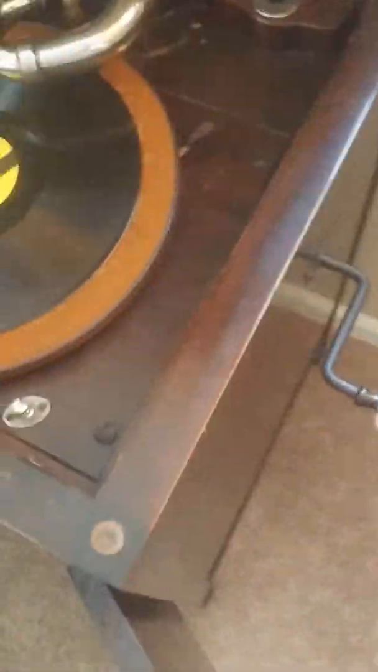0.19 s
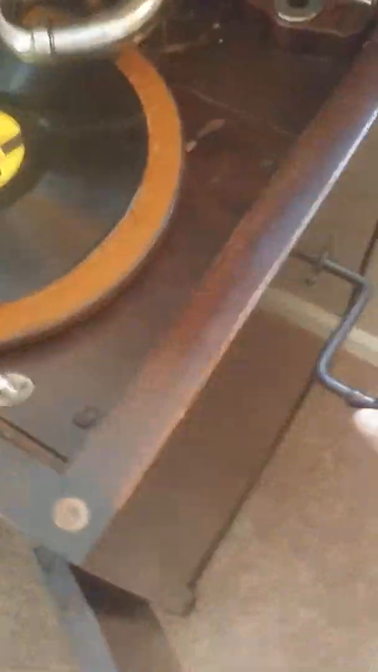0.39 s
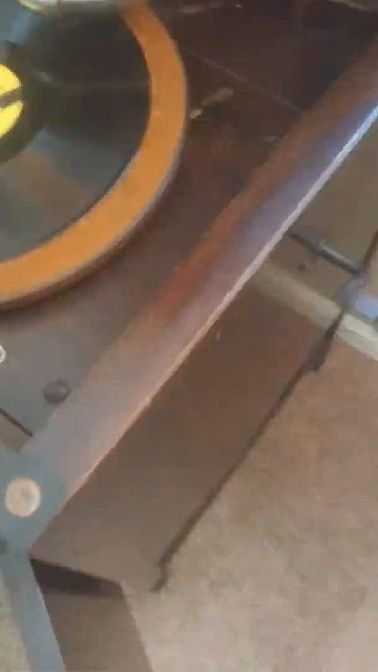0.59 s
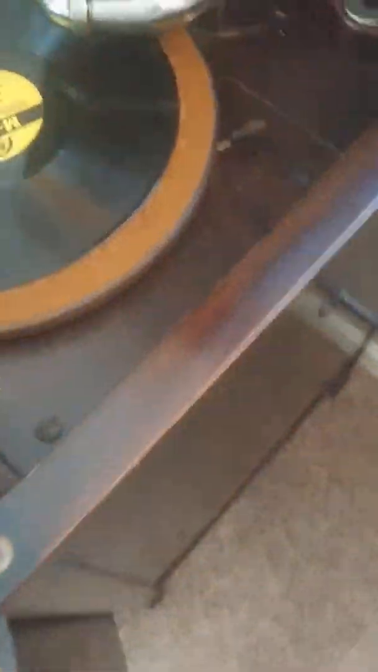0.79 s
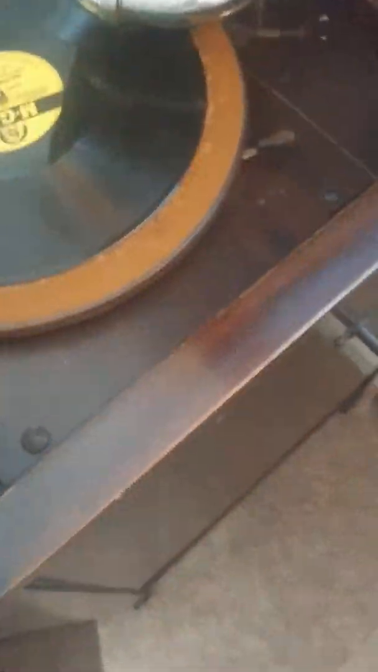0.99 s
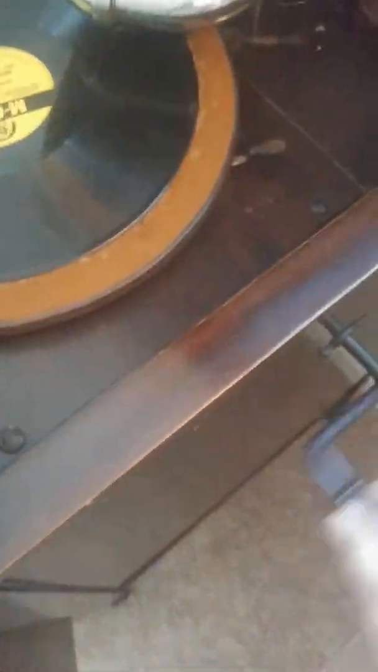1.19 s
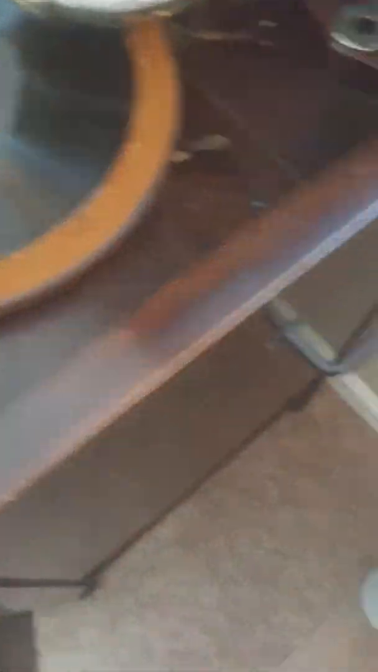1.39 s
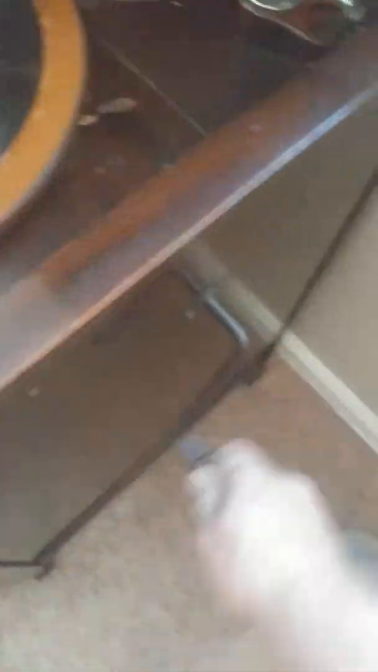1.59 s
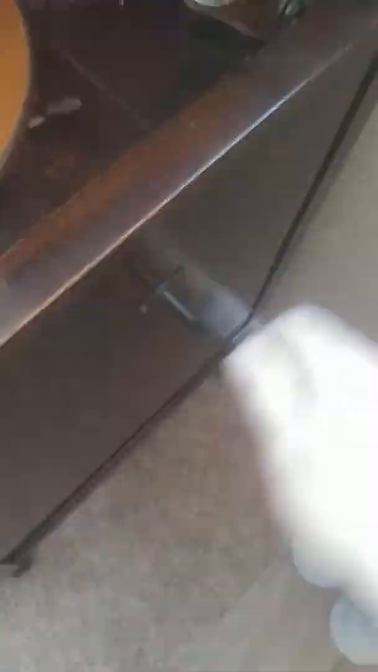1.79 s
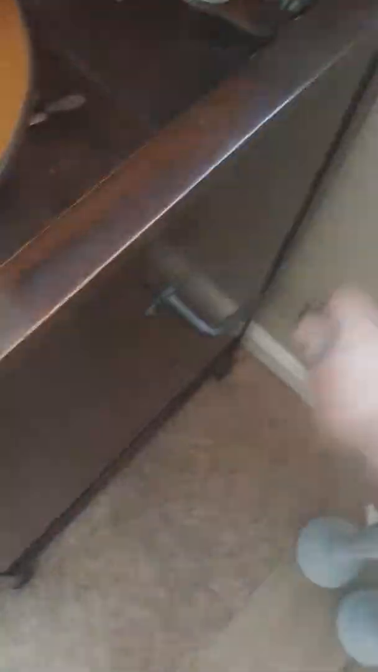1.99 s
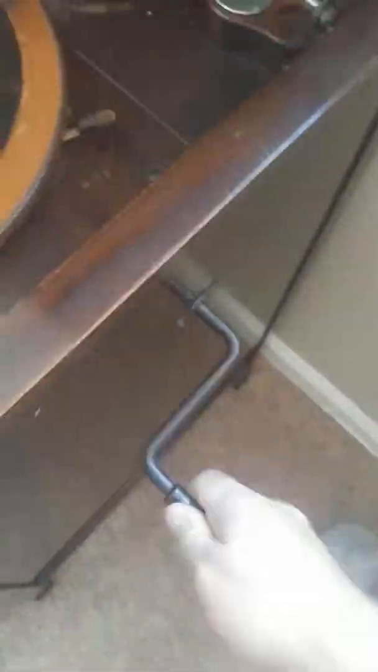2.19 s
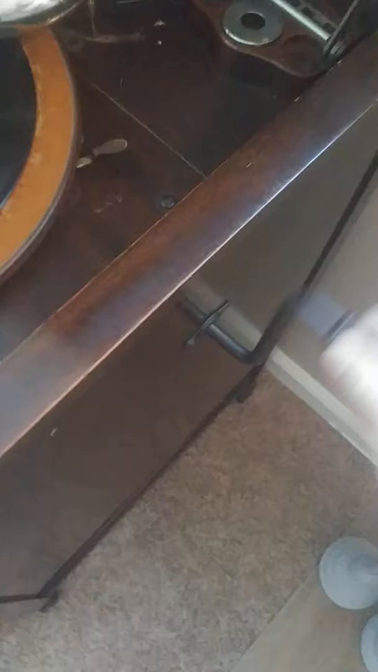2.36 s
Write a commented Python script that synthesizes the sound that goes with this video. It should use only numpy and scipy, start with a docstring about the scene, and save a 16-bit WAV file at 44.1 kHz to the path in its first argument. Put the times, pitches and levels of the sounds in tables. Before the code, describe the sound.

Hand crank winding gears inside a wooden cabinet: two sharp knocks early, the second louder with a bright metal tick, then steady ratcheting, scraping and regular loose clacks, heard close in a small room.

```python
"""In a small room, a stereo pair hears the spring motor of a wooden cabinet phonograph wound by hand.
Gear chatter and a faint crank clack open; two sharp knocks follow as the crank is taken up, with sizzling metal.
Then the gear teeth chatter on, rub and scrape, while the loose crank clacks and thuds and the cabinet booms.
Impacts are decaying bands of noise, most with ringing modes; the gears are trains of such impacts, the boom
is a wavering sine, and steady noise is the quiet room."""
import sys
import numpy as np
from scipy import signal
from scipy.fft import rfft, irfft
from scipy.io import wavfile
from scipy.ndimage import uniform_filter1d

SR = 44100
rng = np.random.default_rng(int(sys.argv[2]) if len(sys.argv) > 2 else 0)


def store_wav(level_fs):
    """Save 16-bit WAV to argv[1]."""
    pcm = np.round(np.clip(np.atleast_2d(level_fs), -1, 1) * 32767)
    wavfile.write(sys.argv[1], SR, pcm.T.astype(np.int16))


N = 110250  # 2.5 s


def amp(db):
    """Decibels to gain."""
    return 10 ** (np.asarray(db) / 20)


def read(points, hz):
    """Reads a spectrum table on a log-frequency axis."""
    f, value = np.transpose(points)
    return np.interp(np.log(hz + 1), np.log(f + 1), value)


def curve(points):
    """Reads a time table at every sample, straight between its points."""
    return np.interp(np.arange(N) / SR, *np.transpose(points))


def evened(x):
    """Scales to rms 1."""
    return x / np.sqrt(np.mean(x ** 2) + 1e-20)


def pan(db):
    """Left and right gains for a level difference, positive to the left."""
    return amp([[db / 2], [-db / 2]])


def add(mix, s, sound):
    """Mixes a stereo sound in at time s."""
    part = mix[:, max(round(s * SR), 0):][:, :sound.shape[1]]
    part += sound[:, :part.shape[1]]


def decay(t, t60):
    """Falls by 60 dB in t60 seconds."""
    return np.exp(-np.log(1000) * t / t60)


# Likeness of the two microphones: columns pitch_hz, correlation
MIC_LIKENESS = [(140, 0.98), (290, 0.95), (450, 0.6), (700, -0.24), (1050, -0.14), (3000, -0.0029)]
# Lean of the sound towards the left microphone: columns pitch_hz, left_over_right_db
LEFT_LEAN = [(150, 1), (330, 0), (600, -1.5), (1400, 3), (3000, 0), (6500, -8), (10500, 10.5), (13000, 1)]
LEFT_LEAD = .3  # share of the left-right difference that is a quarter cycle ahead of the common part


def noise(colour, size):
    """Stereo noise of a given colour, most alike at the two microphones in the bass."""
    hz = np.fft.rfftfreq(size, 1 / SR)
    a, b = np.exp(2j * np.pi * rng.random((2, len(hz))))
    same = read(MIC_LIKENESS, hz)
    mid = a * np.sqrt(1 + same)
    side = (1j * LEFT_LEAD * a + np.sqrt(1 - LEFT_LEAD ** 2) * b) * np.sqrt(1 - same)
    lean_db = read(LEFT_LEAN, hz) * np.array([[.5], [-.5]])
    spectrum = np.array([mid + side, mid - side]) * amp(read(colour, hz) + lean_db)
    return evened(irfft(spectrum, size))


TREBLE_HZ = 1530  # crossover from wood to metal


def treble_share(hz):
    """Near 0 in the wood's range, near 1 in the metal's."""
    return 1 / (1 + (TREBLE_HZ / hz) ** 4)


# Ringing of the struck body: columns pitch_hz, t60_s
BODY_RING = [(60, 0.19), (150, 0.19), (500, 0.16), (1200, 0.039), (3000, 0.1), (10000, 0.032)]
# Tail of the small room: columns pitch_hz, t60_s
ROOM_TAIL = [(60, 0.46), (16000, 0.21)]
# Start of that tail against the direct ringing: columns pitch_hz, level_db
ROOM_TAIL_LEVEL = [(60, -28), (500, -13.5), (2000, -16), (10000, -16)]
RISE_S, RISE_CYCLES = 0.00078, 1  # each band's rise time is the sum of both


def blow(colour, treble_db=0, lag_s=0, size=22050, compact=True):
    """Dense ringing of a struck body: each band swells, dies quickly and leaves a room tail."""
    hz = np.fft.rfftfreq(size, 1 / SR)
    spectrum = rfft(noise(colour, size))
    out = np.zeros((2, size))
    centres = np.geomspace(60, 14000, 12)
    for f, share in zip(centres, np.eye(len(centres))):
        high = treble_share(f)
        t = np.maximum(np.arange(size) / SR - lag_s * (1 - high), 0)  # the wood answers late
        band_gain = np.interp(np.log(hz + 1), np.log(centres), share)
        band = irfft(spectrum * band_gain, size)
        # A compact blow has no late swells.
        power = uniform_filter1d((band ** 2).mean(0), int(6 * SR / f), mode="wrap")
        steady = band / np.sqrt(power) if compact else band
        rise = 1 - np.exp(-(t / (RISE_S + RISE_CYCLES / f)) ** 2)
        direct = decay(t, read(BODY_RING, f))
        tail = amp(read(ROOM_TAIL_LEVEL, f)) * decay(t, read(ROOM_TAIL, f))
        envelope = rise * np.hypot(direct, tail)
        level = band.std() * np.sqrt(np.mean(envelope ** 2)) * amp(treble_db * high)
        out += evened(steady * envelope) * level
    return out


def blows(table, colour, lag_s=0):
    """Plays a table of blows of one kind."""
    out = np.zeros((2, N))
    for s, db, treble_db in table:
        add(out, s, amp(db) * blow(colour, treble_db, lag_s))
    return out


MODES_DB, MODE_RISE_CYCLES = -6.5, 3.3  # all modes against their blow; time constant of the rise


def ringing(table, modes):
    """Each blow sets single modes ringing; the higher ones mostly reach the microphones more out of step."""
    out, t = np.zeros((2, N)), np.arange(SR // 2) / SR
    for s, db, treble_db in table:
        for hz, mode_db, t60 in modes:
            lag = np.arccos(read(MIC_LIKENESS, hz)) * np.array([[0], [1]])  # the right one lags
            tone = np.sin(2 * np.pi * (hz * t + rng.random()) - lag)
            rise = 1 - np.exp(-t * hz / MODE_RISE_CYCLES)
            level = amp(db + mode_db + MODES_DB + treble_db * treble_share(hz))
            add(out, s, level * tone * rise * decay(t, t60) * pan(read(LEFT_LEAN, hz)))
    return out


# Colour of the quiet room: columns pitch_hz, level_db
ROOM_TONE_COLOUR = [(20, -26), (58, 3.5), (130, -12), (200, -24), (3000, -37.5), (7200, -33.5), (8800, -44),
                    (12000, -35.5), (13300, -40)]


def room_tone():
    """The quiet room behind everything, as steady coloured noise."""
    return amp(-51) * noise(ROOM_TONE_COLOUR, N)


# Swells of the cabinet's low boom: columns time_s, level_db
BOOM_SWELLS = [(.25, -60.5), (.3, -37.5), (.4, -73), (1.08, -48.5), (1.29, -39.5), (1.62, -60.5),
               (1.84, -35), (2.06, -58), (2.36, -41), (2.5, -49)]
BOOM_HZ, BOOM_WANDER = 70.96, 0.029  # centre pitch; random spread as a fraction of it


def boom(count=30):
    """The cabinet's lowest resonance: a sine that swells under the load, wavering in pitch."""
    wander = np.interp(np.arange(N), np.linspace(0, N, count), rng.standard_normal(count))
    cycles = np.cumsum(BOOM_HZ * (1 + BOOM_WANDER * wander)) / SR
    return amp(curve(BOOM_SWELLS)) * evened(np.sin(2 * np.pi * cycles))


# Force on the gears: columns time_s, level_db
GEAR_EFFORT = [(0, -27), (.09, -56), (.15, -44.5), (.5, -56.5), (.68, -47.5), (.73, -39.5), (1.09, -42.5),
               (1.2, -39), (1.48, -35.5), (1.64, -39.5), (1.77, -37), (1.9, -43.5), (1.98, -32.5),
               (2.19, -38.5), (2.33, -32), (2.42, -42), (2.5, -31.5)]
# Colour of metal scraping on metal: columns pitch_hz, level_db
SCRAPE_COLOUR = [(700, 5), (2400, -2), (7000, -21.5)]
GRIT_PER_S, GRIT_SPREAD_DB = 36, 3  # mean rate; dB per unit of random strength
GRIT_DB, GRIT_FOLLOW = -30.5, 0.73  # level at 0 dB effort; dB per dB of effort


def grit():
    """Small irregular scrapes of metal on metal, stronger under load."""
    chance, strength = rng.random(N), np.minimum(rng.exponential(1, N), 3)
    clicks = (chance < GRIT_PER_S / SR) * amp(GRIT_SPREAD_DB * strength)
    scrapes = signal.fftconvolve(clicks[None], blow(SCRAPE_COLOUR), axes=1)[:, :N]
    return evened(scrapes) * amp(GRIT_DB + GRIT_FOLLOW * curve(GEAR_EFFORT))


def flutter(depth_db, count=600):
    """A quick random wobble of level."""
    wobble = np.interp(np.arange(N), np.linspace(0, N, count), rng.standard_normal(count))
    return evened(amp(depth_db * wobble))


# Surges of rubbing as the gears bind: columns middle_s, groan_db, scrape_db
RUB_SURGES = [(0.751, -38, -71), (0.828, -37.5, -78), (1.236, -32.5, -52), (1.45, -31.5, -47),
              (1.515, -36.5, -49), (1.963, -33.5, -63)]
# Colour of the gears through the cabinet: columns pitch_hz, level_db
GEAR_CABINET_COLOUR = [(40, -17.5), (60, 1.5), (150, 5), (200, -14.5), (285, 5.5), (370, -9), (485, 8.5),
                       (700, -5), (830, 5), (1000, -4), (1250, -12), (2600, -40), (7000, -35), (16000, -54)]
RUB_S, RUB_FLUTTER_DB = 0.023, 2.7  # time from the middle to 1/e; random spread of level


def rubs():
    """The gears bind in short rough surges: a groan in the cabinet and a scrape of metal."""
    t, out = np.arange(N) / SR, np.zeros((2, N))
    groan, scrape = noise(GEAR_CABINET_COLOUR, N), noise(SCRAPE_COLOUR, N)
    for s, groan_db, scrape_db in RUB_SURGES:
        surge = np.exp(-((t - s) / RUB_S) ** 2)
        out += surge * (amp(groan_db) * groan + amp(scrape_db) * scrape)
    return out * flutter(RUB_FLUTTER_DB)


TEETH_PER_S, TOOTH_JITTER, TOOTH_SPREAD_DB = 87, .13, 2  # jitter in tooth spacings
RASP_DB = -14  # rubbing between the clicks, relative to them


def gears(count=8, size=400):
    """Gear teeth rub and click unevenly into the cabinet, as hard as the hand pushes."""
    jitter, strength, order = rng.standard_normal((size, 3)).T
    at = ((np.arange(size) + TOOTH_JITTER * jitter) * SR / TEETH_PER_S).astype(int)
    which = np.argsort(order) % count  # each tooth gets one of a few different click sounds
    out = np.zeros((2, N))
    for k in range(count):
        clicks = np.zeros(N)
        use = (at >= 0) & (at < N) & (which == k)
        clicks[at[use]] = amp(TOOTH_SPREAD_DB * strength[use])
        click_sound = blow(GEAR_CABINET_COLOUR, compact=False)
        out += signal.fftconvolve(clicks[None], click_sound, axes=1)[:, :N]
    rasp = amp(RASP_DB) * noise(GEAR_CABINET_COLOUR, N)
    return (evened(out) + rasp) * amp(curve(GEAR_EFFORT))


# Colour of the loose metal: columns pitch_hz, level_db
LOOSE_METAL_COLOUR = [(300, -13), (7200, -10), (8800, -17), (10800, -13), (16000, -28)]
SIZZLE_START_S, SIZZLE_HOLD_S, SIZZLE_RELEASE_S, SIZZLE_DB = 0.23, 0.17, 0.045, -49
SIZZLE_PER_S, SIZZLE_RING_S = 220, 0.012  # mean contacts per second; 1/e decay of each


def sizzle(size=2048):
    """Loose metal rattles around the second knock in a quick uneven patter that holds, then fades."""
    t = np.arange(N) / SR - SIZZLE_START_S
    attack = np.clip(t / .01, 0, 1)
    release = np.exp(-np.maximum(t - SIZZLE_HOLD_S, 0) / SIZZLE_RELEASE_S)
    contact = noise(LOOSE_METAL_COLOUR, size) * np.exp(-np.arange(size) / SR / SIZZLE_RING_S)
    hits = (rng.random((1, N)) < SIZZLE_PER_S / SR).astype(float)
    patter = signal.fftconvolve(hits, contact, axes=1)[:, :N]
    return amp(SIZZLE_DB) * attack * release * evened(patter)


# Bright metal ticks, the loudest with the second knock: columns start_s, level_db, decay_s (to 1/e)
METAL_TICKS = [(0.273, -21, 0.0059), (.589, -47.5, 0.0017), (1.869, -48, 0.00092)]
# Colour of the ticks: columns pitch_hz, level_db
METAL_TICK_COLOUR = [(3000, -25), (9000, -12.5), (10700, 5.5), (12500, -28), (16000, -29)]
TICK_PAN_DB = 12.5  # added to the lean already in the noise


def ticks(size=2048):
    """Dry metal ticks towards the left microphone: noise that dies within milliseconds."""
    out, t = np.zeros((2, N)), np.arange(size) / SR
    for s, db, decay_s in METAL_TICKS:
        tick = np.exp(-t / decay_s) * noise(METAL_TICK_COLOUR, size)
        add(out, s, amp(db) * pan(TICK_PAN_DB) * tick)
    return out


# Dull thuds, the first giving the first knock its low body, the rest as the load shifts: columns start_s,
# level_db, treble_db
THUDS = [(.206, -20.5, -30), (.608, -42, -3), (1.13, -24, -16), (1.6705, -22, 10.5), (2.208, -21, 9)]
# Colour of the thuds: columns pitch_hz, level_db
THUD_COLOUR = [(35, -32), (65, 16), (200, -3.5), (290, 14), (390, -2.5), (480, 11.5), (700, -1.5),
               (900, 9.5), (1500, -2.5), (3000, -41), (16000, -73)]


def thuds():
    """Dull thuds in the cabinet, one under the first knock and the rest from the shifting load, as dense
    ringing without separate modes."""
    return blows(THUDS, THUD_COLOUR)


# Metal clacks of the crank in its socket: columns start_s, level_db, treble_db
CRANK_CLACKS = [(.009, -43.5, 23), (.187, -39, 2), (.2535, -23, -4), (.2697, -22.5, -2.5),
                (.9645, -23.5, -5.5), (1.5468, -22, -6), (2.044, -43.5, 6), (2.087, -26, -8.5),
                (2.494, -25.5, -13)]
# Colour of the clacks: columns pitch_hz, level_db
CRANK_CLACK_COLOUR = [(220, -19), (560, 1), (880, -1), (1700, -14), (2300, -9), (4100, -20.5), (7000, -21),
                      (9000, -35.5), (16000, -44)]
# Modes of the crank in its socket: columns pitch_hz, level_db, t60_s
CRANK_MODES = [(531, -3, 0.17), (762, 5.5, 0.028), (2245, -9, 0.08), (4750, -8.5, 0.044)]


def clacks():
    """The loose crank clacks in its socket, the wood answering up to 5 ms after the metal."""
    return blows(CRANK_CLACKS, CRANK_CLACK_COLOUR, .005) + ringing(CRANK_CLACKS, CRANK_MODES)


# Hard knocks of the crank: columns start_s, level_db, treble_db
CRANK_KNOCKS = [(0.2038, -20.5, 5.5), (0.2741, -9.5, 4)]
# Colour of the knocks: columns pitch_hz, level_db
CRANK_KNOCK_COLOUR = [(40, -38), (65, -31), (150, -2), (210, -22), (520, 5.5), (750, 7.5), (1050, 3.5),
                      (1900, -7), (2500, -18.5), (7000, -15.5), (9000, -23), (11300, -15), (16000, -32)]
# Modes of the struck cabinet: columns pitch_hz, level_db, t60_s
CABINET_MODES = [(288, 0, 0.11), (516, 1.5, 0.23), (598, -5, 0.2), (771, -9, 0.18), (921, -10, 0.08),
                 (1032, 13, 0.035), (1412, -11, 0.13), (1928, -10.5, .06)]


def knocks():
    """The crank knocks hard on the cabinet, the wood answering up to 1 ms after the metal."""
    return blows(CRANK_KNOCKS, CRANK_KNOCK_COLOUR, .001) + ringing(CRANK_KNOCKS, CABINET_MODES)


def scene():
    """The quiet room, the cabinet, the gears and the crank together."""
    background = room_tone() + boom()
    mechanism = grit() + rubs() + gears()
    loose_metal = sizzle() + ticks()
    crank = thuds() + clacks() + knocks()
    return background + mechanism + loose_metal + crank


EDGE_HZ = 15900  # top of the recorder's band


def record(dry):
    """The recorder's bass cut and band limit."""
    bass_cut = signal.butter(3, 42, "highpass", fs=SR, output="sos")
    band_limit = signal.firwin(511, EDGE_HZ, window=("kaiser", 9), fs=SR)
    return signal.oaconvolve(signal.sosfilt(bass_cut, dry), band_limit[None], "same")


dry = scene()
out = record(dry)
store_wav(out)
```